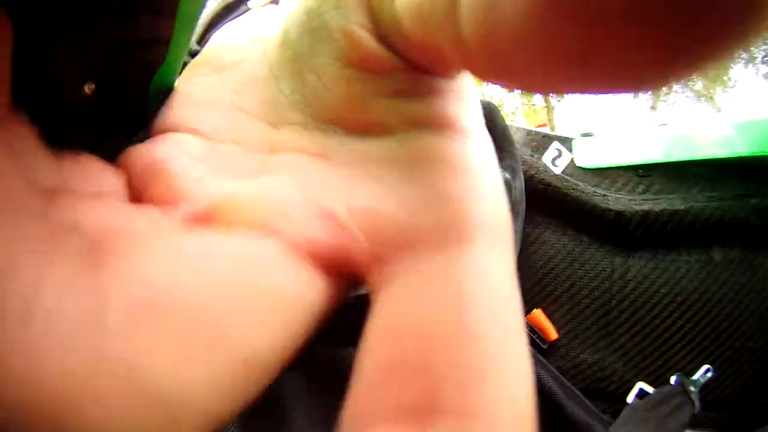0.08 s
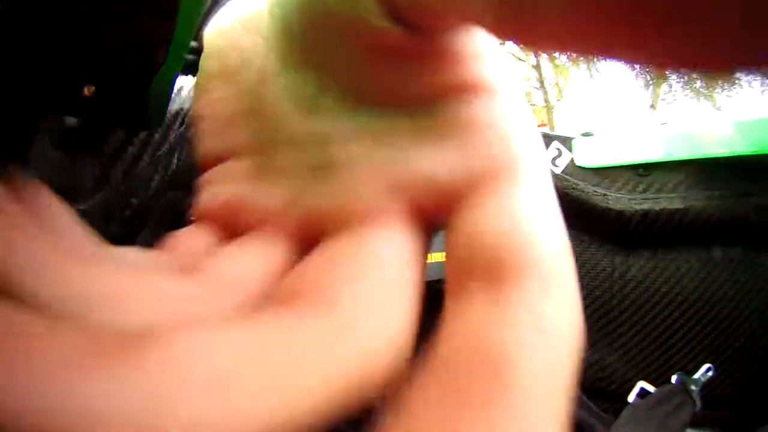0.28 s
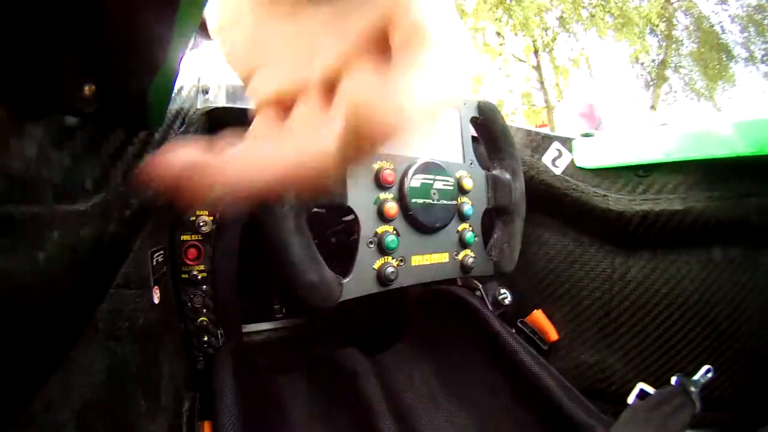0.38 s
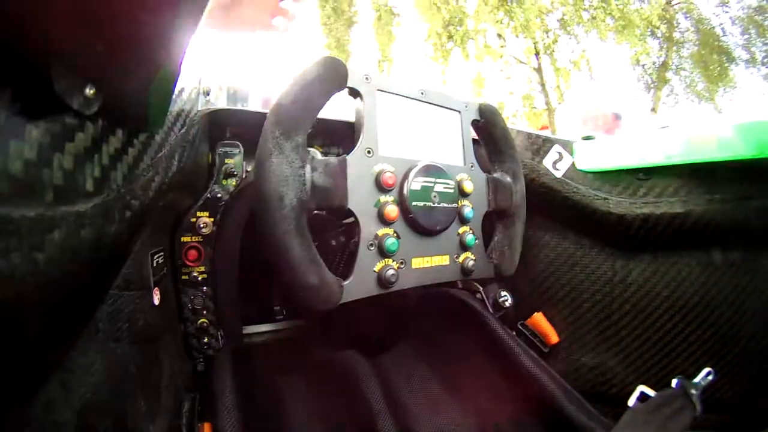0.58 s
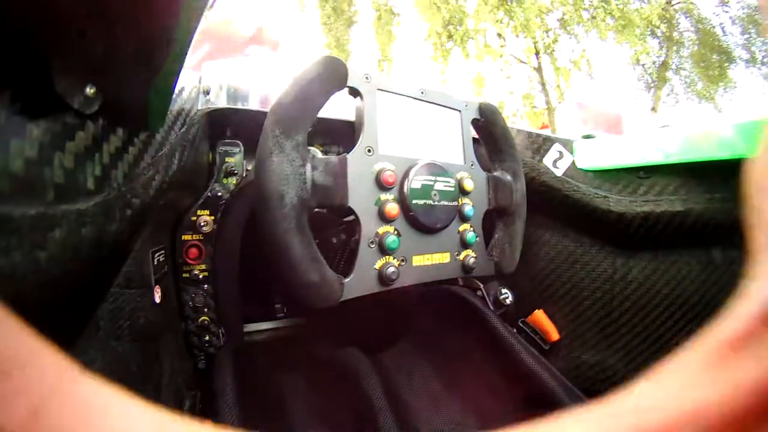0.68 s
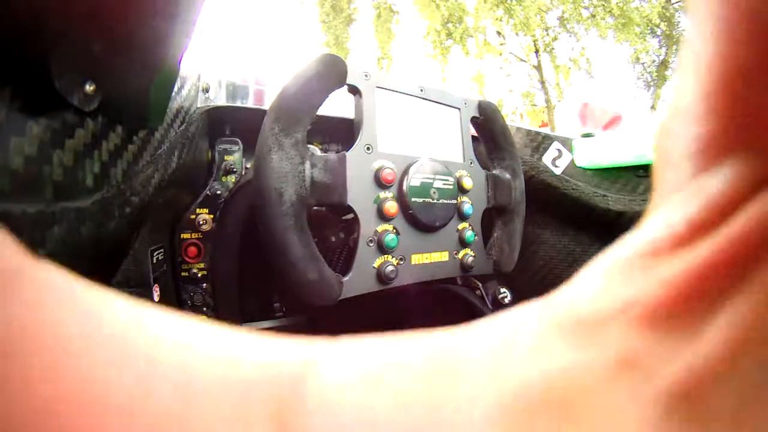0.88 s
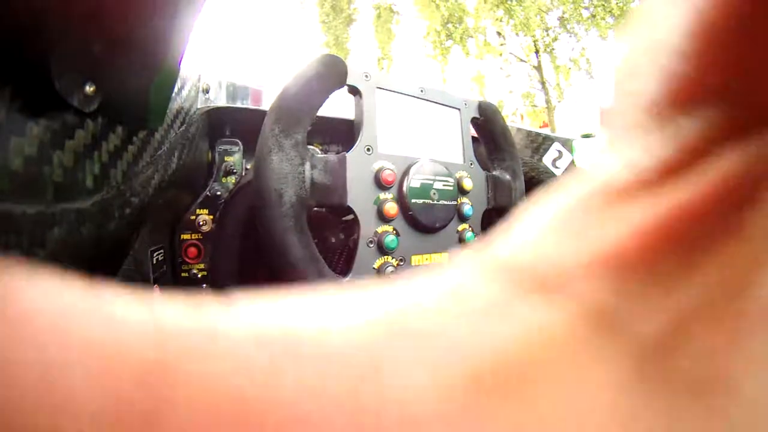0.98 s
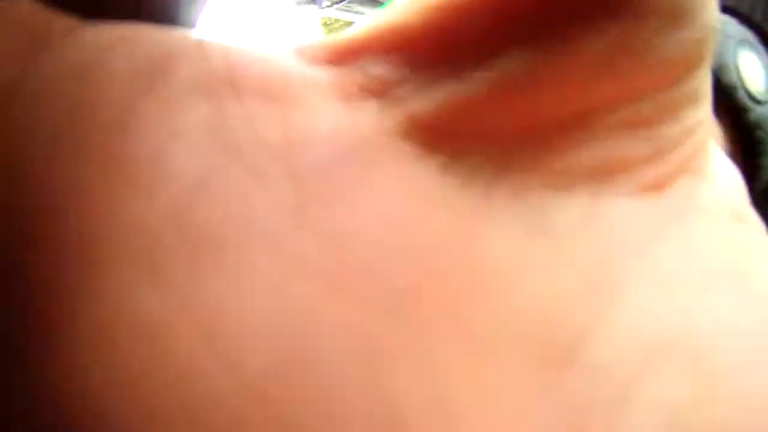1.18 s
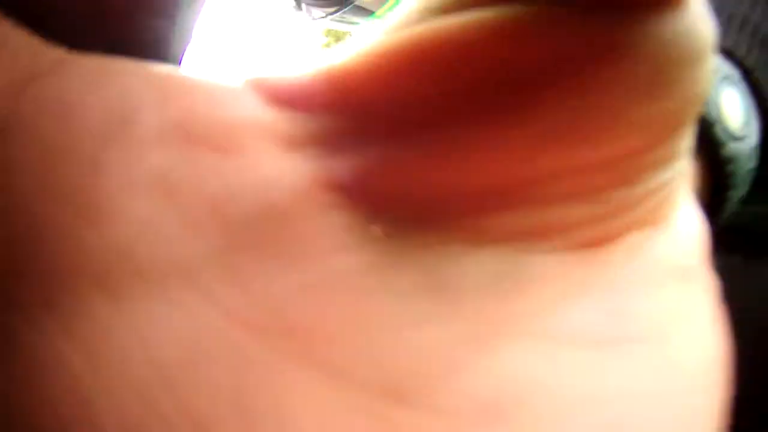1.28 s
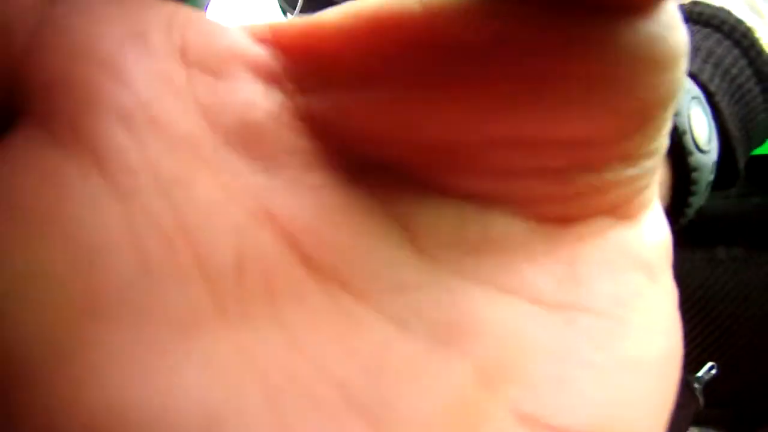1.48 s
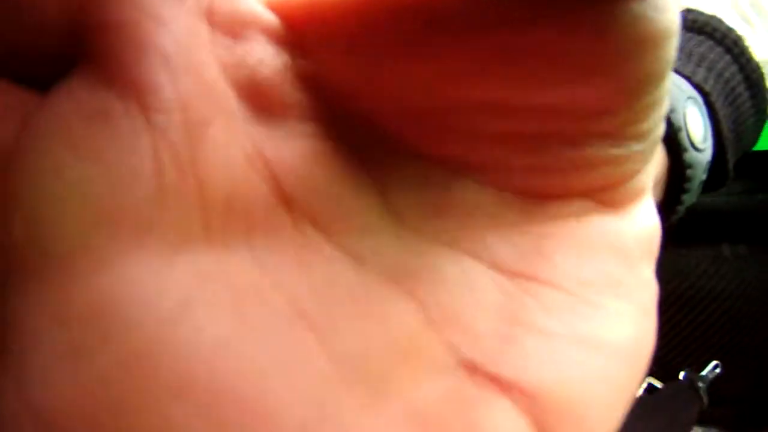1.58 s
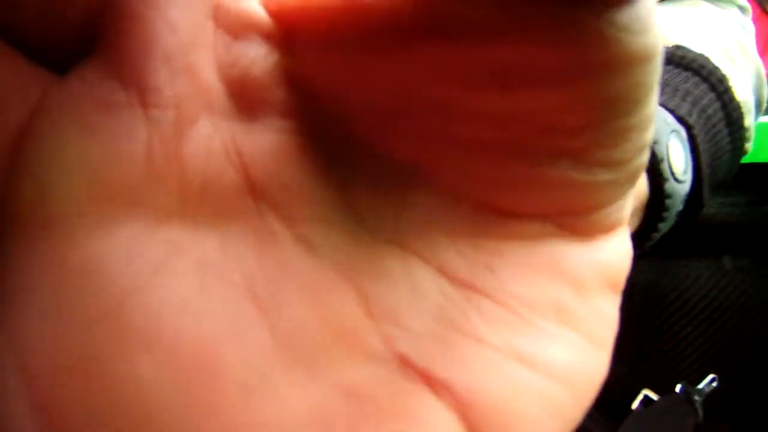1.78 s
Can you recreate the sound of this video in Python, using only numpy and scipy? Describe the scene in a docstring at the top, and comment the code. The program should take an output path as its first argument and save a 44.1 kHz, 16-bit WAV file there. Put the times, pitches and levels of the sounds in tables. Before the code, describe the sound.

Small hard plastic camera case worked loose by hand: thuds, a loud scrape, ticks over faint engine idle

```python
"""Cased camera worked loose by hand

A small camera in a hard plastic case, mounted in a racing cockpit, is gripped and worked loose by hand.
Damped swings make the bumps; noise bursts and stick-slip grains ring the case as ticks and scrapes;
shaped noise makes the skin strokes and deep sway. An engine idles nearby as uneven pulses ringing its exhaust,
muffled by the shell, under hiss coloured by the air cavity at the microphone, which overloads."""
import sys
import numpy as np
from scipy import signal
from scipy.fft import rfft, irfft
from scipy.io import wavfile
from scipy.ndimage import uniform_filter1d

SR = 44100
rng = np.random.default_rng(int(sys.argv[2]) if len(sys.argv) > 2 else 0)


def store_wav(level_fs):
    """Save 16-bit WAV to argv[1]."""
    pcm = np.round(np.clip(np.atleast_2d(level_fs), -1, 1) * 32767)
    wavfile.write(sys.argv[1], SR, pcm.T.astype(np.int16))


N = 79380  # 1.8 s


def undb(db):
    """Decibels to gain."""
    return 10 ** (np.asarray(db) / 20)


def unit(x):
    """Scale to rms 1."""
    return x / np.sqrt(np.mean(x ** 2))


def curve(table, column):
    """One column of a table, joined by straight lines over the times in column 0."""
    points = np.array(table, float)
    return np.interp(np.arange(N) / SR, points[:, 0], points[:, column])


def band(x, hz, width):
    """Two-pole resonance, gain 1 at the centre."""
    return signal.lfilter(*signal.iirpeak(min(hz, .45 * SR), hz / width, SR), x)


def walk(rate):
    """Random levels held 1 / rate s and slewed twice."""
    hold = int(SR / rate)
    steps = np.repeat(rng.standard_normal(N // 20)[:N // hold + 1], hold)
    return 1.33 * uniform_filter1d(uniform_filter1d(steps, hold), hold)[:N]


def engine():
    """Uneven firings and gas noise ring the exhaust; each resonance arrives by its own path."""
    # Idle. Each row: time in seconds, mean firing rate in Hz, gain in dB.
    idle = [(0.0, 46.98, -38), (0.33, 44.72, -38), (.75, 47.88, -37.5), (1.1, 47.19, -39),
            (1.27, 43.8, -39), (1.5, 47.16, -37.5), (1.8, 48.83, -38.5)]
    # Exhaust heard through the shell. Each row: centre in Hz, nominal width in Hz, relative level in dB.
    exhaust = [(45.6, 52, 3.5), (90.4, 47.6, 1.5), (134.2, 29, -0.5), (180.5, 37, -6.5), (283.9, 44, -5),
               (307.2, 14.3, -13)]
    jitter, scatter_db, gas_noise_db = .03, 2.2, -2  # jitter is a share of the firing rate
    firing_hz = curve(idle, 1) * (1 + jitter * walk(40))
    cycle = np.cumsum(firing_hz / SR).astype(int)
    strength = undb(scatter_db * rng.standard_normal(400))
    pulses = unit(np.diff(cycle, prepend=0) * strength[cycle])
    out = 0
    for hz, width, db in exhaust:
        delayed = np.roll(pulses, rng.integers(SR // 47))  # up to about one firing late
        drive = delayed + undb(gas_noise_db) * rng.standard_normal(N)
        pass_width = width * 1.38  # two passes narrow the band
        ring = band(band(drive, hz, pass_width), hz, pass_width)
        out = out + undb(db) * unit(ring)
    return out * undb(curve(idle, 2))


def hiss():
    """Engine and air noise in quarter-octave bands that flicker alone and flutter together."""
    # Colour inside the case. Each row: frequency in Hz, relative noise density in dB per Hz.
    colour = np.array([(330, -60), (400, -11.5), (630, -12), (880, -14), (1410, 0), (2100, -8),
                       (3120, -20.5), (3600, -26.5), (4400, -20), (5300, -35), (6500, -43.5), (8500, -51),
                       (15500, -67)])
    # Each row: time in seconds, rms level in dB.
    loudness = [(0.0, -42), (1.8, -39)]
    flutter = walk(60)
    octave = np.log2(np.maximum(np.fft.rfftfreq(N, 1 / SR), 1))
    tilt = undb(np.interp(octave, np.log2(colour[:, 0]), colour[:, 1]))
    shaped = rfft(rng.standard_normal(N)) * tilt
    out = 0
    for centre in np.arange(8, 14.25, .25):  # log2 of Hz
        overlap = np.maximum(1 - 4 * np.abs(octave - centre), 0)
        flicker_db = 1.3 * flutter + .6 * walk(12)
        out = out + undb(flicker_db) * irfft(shaped * overlap, N)
    return unit(out) * undb(curve(loudness, 1))


def sway():
    """Deep irregular pressure as the case sways under the hand: low noise passed twice through one resonance."""
    # Each row: time in seconds, gain of the rumble in dB.
    grip = [(0, -34.5), (.22, -65.5), (.3, -25), (.46, -29.5), (.55, -36.5), (.74, -37), (.9, -41),
            (1.08, -25), (1.25, -32), (1.4, -24.5), (1.6, -26), (1.8, -32)]
    hz, pass_width_hz = 26.5, 16.8
    rumble = band(band(rng.standard_normal(N), hz, pass_width_hz), hz, pass_width_hz)
    return unit(rumble) * undb(curve(grip, 1))


def bumps():
    """Each bump rocks the case: a damped swing whose pitch sags."""
    # Each row: start in seconds, gain before rise and decay in dB, starting pitch in Hz, direction of push.
    knocks = [(0.238, -9, 86, -1), (0.258, 7, 81.8, -1), (0.617, -7, 83, 1), (0.733, -14, 51, 1),
              (0.972, -10.5, 75, 1), (1.523, -7, 33.7, 1)]
    sag_s, decay_s, rise_s = .03, .009, .002
    out = 0
    for start, db, hz, way in knocks:
        t = np.maximum(np.arange(N) / SR - start, 0)
        swing = np.sin(2 * np.pi * hz * sag_s * (1 - np.exp(-t / sag_s)))
        env = np.exp(-t / decay_s) * (1 - np.exp(-t / rise_s))
        out = out + np.sign(way) * undb(db) * swing * env
    return out


def strokes():
    """Soft rustles of skin on plastic: flickering band noise that swells, then stops faster."""
    # Each row: start in seconds, length in seconds, gain at the top of the swell in dB, centre in Hz.
    rubs = [(0.244, 0.037, -46, 3100), (0.324, 0.21, -60.5, 6000), (0.714, 0.24, -64.5, 5300),
            (0.95, 0.031, -60, 5600), (0.976, 0.022, -59.5, 5200), (1.037, 0.036, -56.5, 5100),
            (1.497, 0.016, -36.5, 3520)]
    swell = 0.67  # share of the length spent swelling
    out, t = 0, np.arange(N) / SR
    for start, length, db, hz in rubs:
        env = np.interp(t, [start, start + swell * length, start + length], [0, 1, 0]) ** .8
        rough = rng.standard_normal(N) * undb(2 * walk(370))
        rustle = band(band(band(rough, hz, hz * .7), hz, hz), hz, hz * 1.5)
        out = out + undb(db) * env * unit(rustle)
    return out


def case(x, low=0.79, high=0.41):
    """Modes of the plastic case in alternating polarity; low and high scale its lowest and upper modes."""
    # Each row: mode centre in Hz, width in Hz, level in dB before the low and high gains.
    modes = [(355, 220, 2), (909, 290, 3), (1310, 357, 4.5), (1674, 320, 4.5), (2013, 148, 2),
             (2380, 670, -7.5), (3140, 1070, -11), (4230, 770, -8.5), (5020, 1170, -18.5),
             (6200, 1300, -24.5), (8900, 2300, -51)]
    gains = [low] * 2 + [1] * 3 + [high] * (len(modes) - 5)
    out = 0
    for k, (gain, (hz, width, db)) in enumerate(zip(gains, modes)):
        out = out + (-1) ** k * gain * undb(db) * band(x, hz, width)
    return out


def ticks():
    """Ticks and creaks: a snap and a short burst of noise ring the point of contact and the case."""
    # Each row: start in seconds, peak level in dB, contact pitch in Hz, burst length in seconds.
    contacts = [(.2585, -17, 916, 0.0013), (0.476, -28, 2530, 0.0008), (0.585, -13.5, 500, 0.0033),
                (0.5965, 1, 469, 0.0013), (0.607, -10.5, 5465, 0.0005), (0.6308, -12, 5470, 0.0002),
                (0.6968, -13, 4370, 0.0008), (0.7684, -24, 2600, 0.0037), (0.8334, -15.5, 1400, 0.0019),
                (0.8372, -16, 868, 0.0019), (0.8394, -24, 4070, 0.0005), (0.9, -25, 1520, 0.01),
                (0.9125, -12.5, 1610, 0.0045), (0.913, -23, 3290, 0.007), (1.0312, -27, 590, 0.00113),
                (1.073, -24, 1810, 0.0014), (1.3906, -16, 3220, 0.0018), (1.3892, -14, 1760, 0.0021),
                (1.5064, -27.5, 1030, 0.0013)]
    relative_width, contact_db, snap_size = .3, 5, 8  # contact ring: width over centre, gain beside the case
    out, t = np.zeros(N + 2048), np.arange(2048) / SR
    snap = snap_size * (t == 0)
    for start, db, hz, length in contacts:
        burst = rng.standard_normal(len(t)) * np.exp(-(t / length) ** 2)
        width = max(hz * relative_width, 1 / length)  # brief contacts are broad
        push = band(burst + snap, hz, width)
        body = case(band(push, hz, hz) + snap * undb(-20))
        tick = body + undb(contact_db) * band(push, hz, width)
        i = int(start * SR)
        out[i:i + len(t)] += undb(db) * tick / np.abs(tick).max()
    return out[:N]


def scrape():
    """The hand scrapes off the case: dense stick-slip grains of uneven size ring its modes."""
    # Each row: time in seconds, gain in dB, gain of the upper modes in dB, gain of the two lowest in dB.
    drag = [(.54, -70, 5.5, 3), (.565, -20.5, -16, 3), (.578, -22.5, 0.5, -1), (.594, -14.5, 1.5, 4),
            (.604, 1, -14.5, 1), (.611, -2, -2.5, -3), (.616, -24, 13.5, 10), (.625, -10, -1.5, 5.5),
            (.64, -16, 0, 3), (.655, -19.5, 3.5, -9), (.666, -25, 1, 0), (.684, -16, 0.5, 0.5),
            (.72, -33.5, 8.5, -1), (.77, -65, 22, -7.5)]
    grains_per_s, mean_excess_db = 6000, 2.3  # grain sizes spread exponentially in dB
    chance, sign, size = rng.random((3, N))
    touching = np.arange(N) / SR < drag[-1][0]
    slips = touching * (chance < grains_per_s / SR)
    grains = slips * np.sign(sign - .5) * undb(-mean_excess_db * np.log(size))
    bright, low_body = undb(curve(drag, 2)), undb(curve(drag, 3))
    ringing = case(unit(band(grains, 3090, 6800)), low_body, bright)
    return ringing * undb(curve(drag, 1))


def scene():
    """Everything reaches one microphone inside the case."""
    return (engine() + hiss() + sway() + bumps() + strokes() + ticks() + scrape())[None]


def low_pass(x):
    """Removes everything above the highest recorded frequency."""
    return signal.sosfilt(signal.butter(12, 15940, fs=SR, output="sos"), x)


def record(dry):
    """The microphone adds faint self noise and overloads hard at a fixed ceiling."""
    self_noise_db, ceiling = -78.5, .7
    noisy = dry + undb(self_noise_db) * rng.standard_normal(dry.shape)
    mix = np.clip(noisy, -ceiling, ceiling)
    return low_pass(mix)


dry = scene()
out = record(dry)
store_wav(out)
```